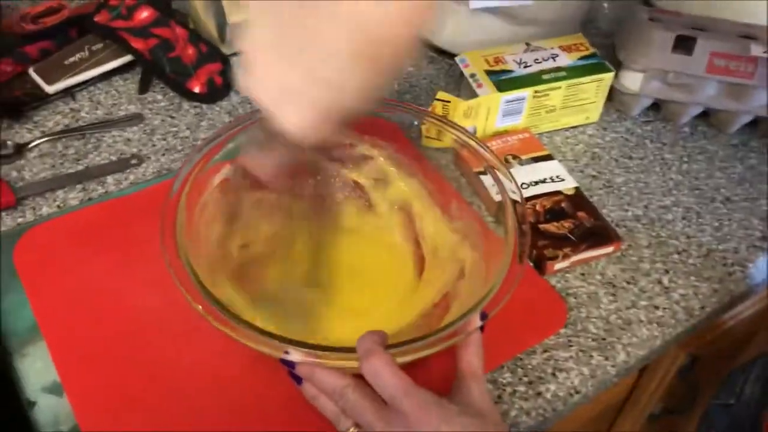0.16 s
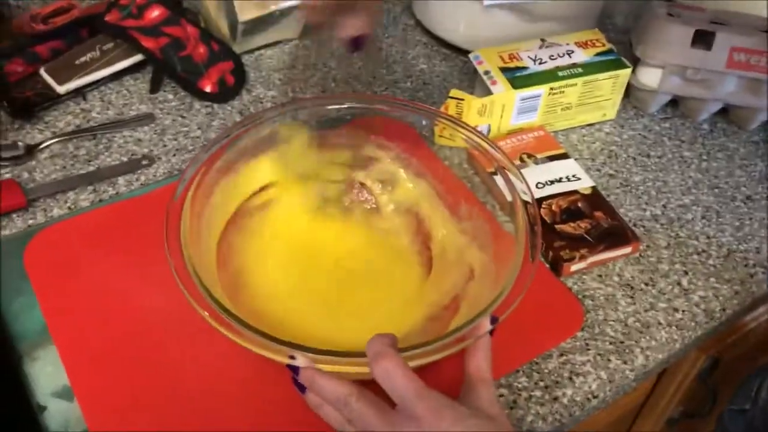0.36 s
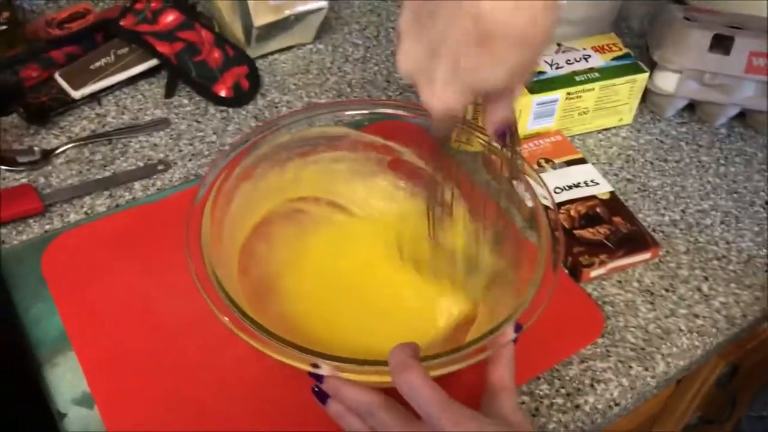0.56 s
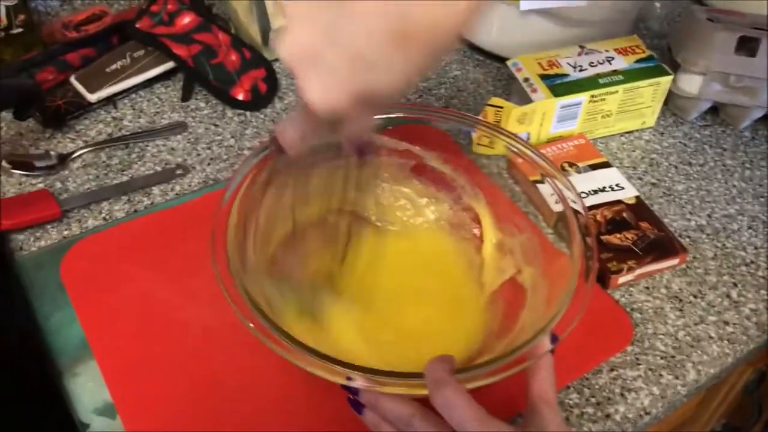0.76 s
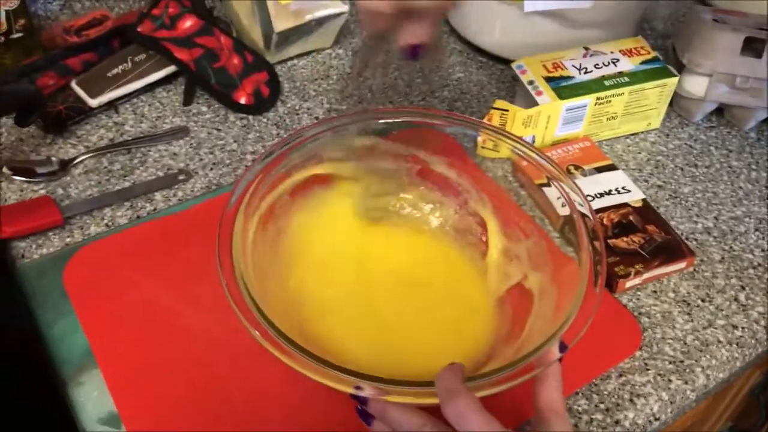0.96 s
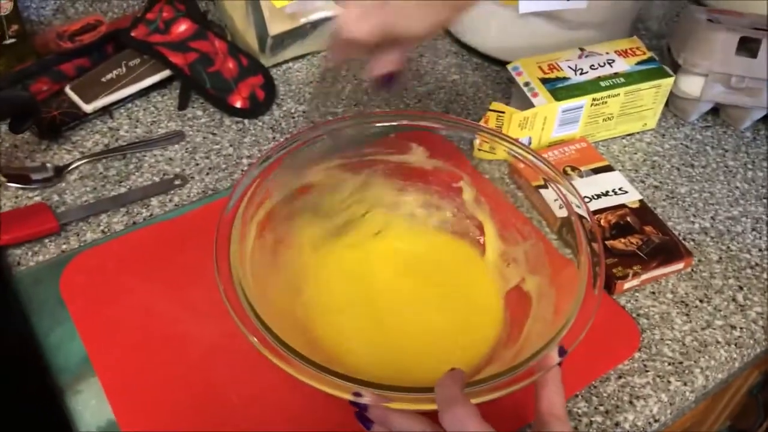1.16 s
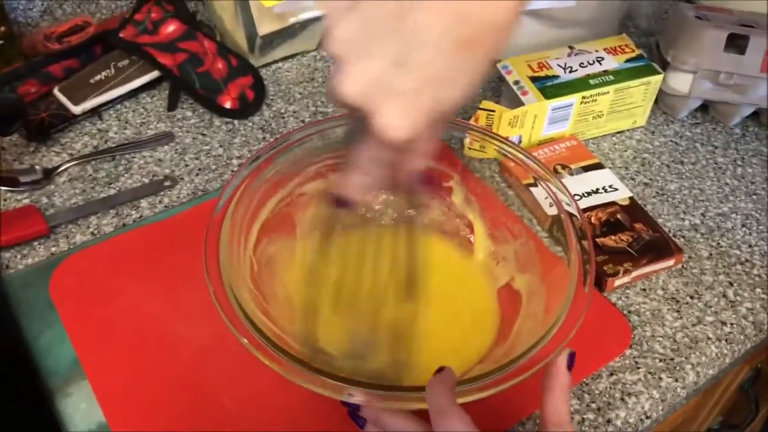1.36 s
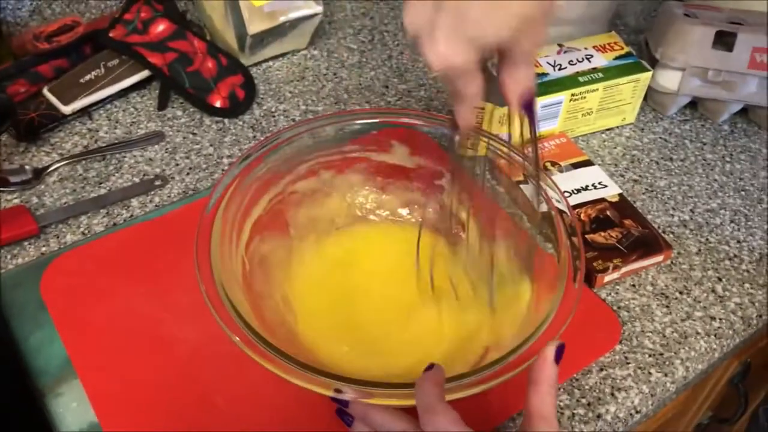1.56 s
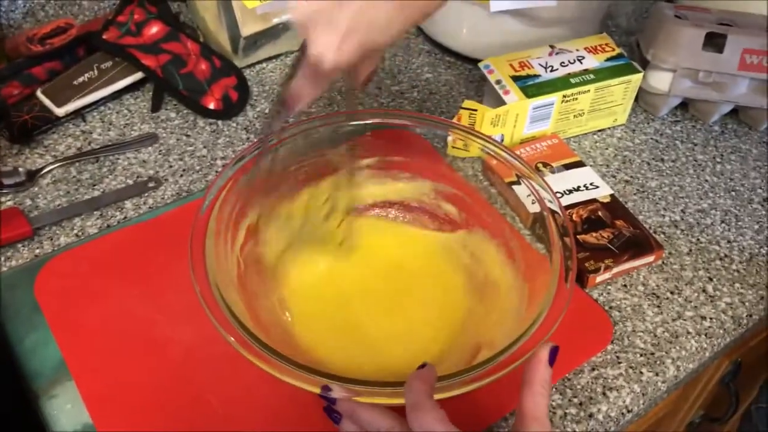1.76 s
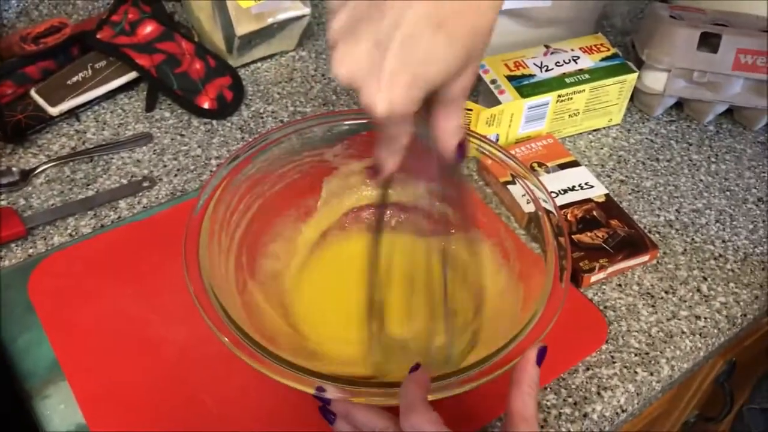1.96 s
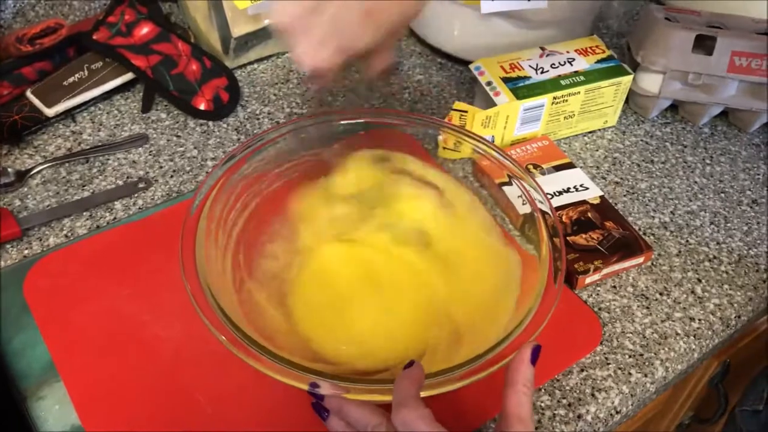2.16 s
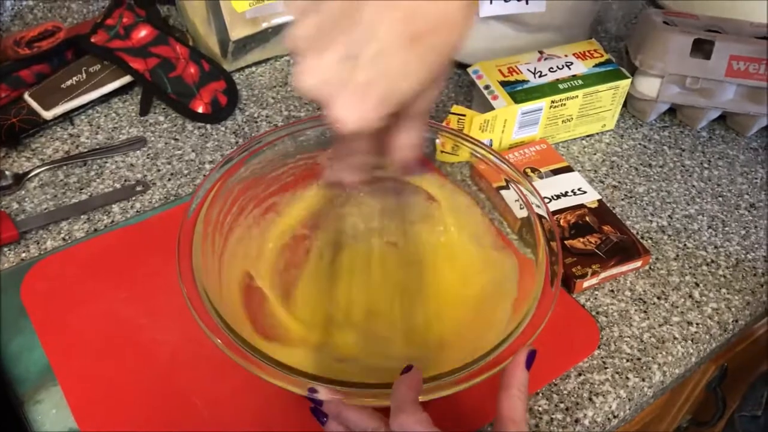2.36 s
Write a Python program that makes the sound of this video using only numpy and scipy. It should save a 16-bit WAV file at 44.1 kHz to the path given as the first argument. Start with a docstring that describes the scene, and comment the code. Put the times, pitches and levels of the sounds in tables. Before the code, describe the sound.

A wire whisk beats eggs in a glass bowl close by, ticking and scraping over a wet crackle. At about 0.2 seconds it clinks hard on the glass, followed by a soft bump of the bowl. From 0.7 seconds quick knocks crowd together with small plops and squelches. After 1.9 seconds the knocks fade, leaving ticks and wet sounds. A faint low kitchen hum lies behind throughout.

```python
"""A small kitchen, one microphone close to a hand-held glass bowl: a wire whisk beats eggs and sugar.
From the start the wires tick, scrape the wall and stir a wet crackle. At 0.24 s they knock hard and
ring the glass, then the bowl bumps once on its mat. From 0.7 s the knocks crowd together and air
pockets plop and squelch out of the egg. After 1.9 s the knocks fade, leaving mostly ticks and crackle.
A low hum and faint room noise lie far behind throughout."""
import sys
import numpy as np
from scipy import signal
from scipy.fft import rfft, irfft
from scipy.io import wavfile

SR = 44100
rng = np.random.default_rng(int(sys.argv[2]) if len(sys.argv) > 2 else 0)


def int16_out(signal):
    """Quantize to a 16-bit WAV file."""
    q = np.round(np.clip(np.atleast_2d(signal).T, -1, 1) * 32767)
    wavfile.write(sys.argv[1], SR, q.astype(np.int16))


N = 105840  # 2.4 s

# Levels in the tables are relative: each source adds its own gain.
# Wires knock on the glass. The point of contact decides how strongly each main mode rings;
# a clean knock rises fast, a glancing one slowly.
# start_s, clack_db, low_mode_db, middle_mode_db, high_mode_db, rise_s
KNOCKS = [(0.2371,-10,-23,-16.5,-5,0.0012), (0.246,-21,-33,-47,-18,0.0018),
          (0.5308,-15.5,-39,-17.5,-30.5,0.00024), (0.5487,-17.5,-52,-22,-42,0.00034),
          (.7185,-26,-46,-58,-36,0.0006), (0.725,-33,-37,-59,-28.5,0.0033), (0.756,-25,-34,-62,-27,0.0037),
          (0.771,-23.5,-26,-62,-26,0.004), (.782,-20,-21.5,-25,-20,0.0009), (0.8128,-26,-56,-43,-47,0.0024),
          (0.838,-26.5,-30,-55,-24.5,0.0012), (.854,-29,-54,-57,-27,0.00075),
          (0.881,-31,-42.5,-39,-41,0.0029), (0.9228,-24,-49,-27.5,-31,0.00075),
          (0.957,-27,-30.5,-54,-59,0.00095), (0.983,-38,-66,-54,-53,.001),
          (1.0105,-31,-37.5,-60,-34.5,0.00035), (1.048,-35.5,-36,-37,-35,0.0033),
          (1.069,-26,-57,-40,-37,0.0024), (1.09,-27,-39,-53,-35,0.0014), (1.133,-44,-36,-48,-37,0.0025),
          (1.2018,-27.5,-41,-75,-47,0.00057), (1.228,-26,-34.5,-36.5,-40.5,0.013),
          (1.263,-22,-28,-31,-38,0.0025), (1.37,-26,-40,-34,-33.5,0.0076), (1.387,-26.5,-44,-27,-55,0.0094),
          (1.411,-28,-61,-44,-50,0.0024), (1.62,-27.5,-55,-34,-36,0.0017), (1.665,-23,-36,-37,-32,0.0006),
          (1.6864,-23,-37,-39,-40,0.0034), (1.737,-29.5,-34,-42,-42,0.0014),
          (1.768,-36.5,-38.5,-53,-37,0.0024), (1.849,-31,-55,-55,-41.5,0.027),
          (1.889,-31,-38.5,-65,-51,0.0017), (1.935,-44,-62,-70,-41,0.018), (2.168,-57,-40,-52,-58,0.0015),
          (2.268,-45,-42,-40,-48,0.0081)]
# Modes of the glass bowl: pitch_hz
BOWL_MODE_HZ = [533, 1408, 2608, 4085, 3010, 3530, 5704, 6830, 7455, 8140, 8695, 9455, 11435]
# Strength and ring time of the same modes: level_db, t60_s
BOWL_MODE_RING = [(-24.5, 0.34), (-3.5, 0.092), (-4, 0.086), (-3.5, 0.064), (-19.5, 0.12), (-20.5, 0.13),
                  (-7.5, 0.048), (-19.5, 0.059), (-12.5, 0.062), (-14, 0.073), (-17, 0.063), (-11, 0.059),
                  (-15, 0.023)]
# Wires click against each other or swish through the mixture: start_s, level_db, rise_s
TICKS = [(0.0495,-19.5,0.00041), (0.0694,-22,0.003), (.143,-21.5,0.0084), (.162,-33,0.0058),
         (0.189,-24.5,0.004), (0.221,-24,0.0014), (0.4002,-18,0.0002), (0.457,-29,0.0014),
         (0.507,-23.5,0.0046), (0.571,-19.5,0.0011), (0.6504,-25,0.0022), (0.68,-20.5,0.0037),
         (1.161,-21.5,.005), (1.347,-21.5,0.002), (1.4747,-25,0.0017), (1.583,-22.5,0.0057),
         (1.651,-20,.002), (1.814,-33,0.00091), (1.846,-24,0.0009), (1.86,-25.5,0.0025),
         (1.872,-22.5,0.0022), (1.891,-31,0.0018), (1.924,-24,0.0011), (1.956,-22.5,0.0035),
         (2.017,-23,0.0012), (2.045,-23,0.0039), (2.095,-25.5,0.0037), (2.123,-28,.001),
         (2.136,-18.5,0.011), (2.154,-31,.001), (2.1625,-31,0.00061), (2.186,-27,0.0025),
         (2.218,-25,0.0023), (2.291,-27.5,0.0024), (2.3501,-20,0.001), (2.377,-30,0.0016)]
# Scraping level, following the pressure of the whisk on the wall: time_s, level_db
WALL_PRESSURE = [(0,-41.5), (.2,-43), (.38,-42), (.5,-36.5), (.63,-42.5), (.74,-35.5), (.88,-38),
                 (1.0,-38.5), (1.1,-36), (1.18,-35), (1.28,-40.5), (1.42,-35.5), (1.57,-42.5), (1.7,-35),
                 (1.85,-41.5), (1.95,-36), (2.06,-47), (2.4,-49.5)]
# Crackle level, following the speed of the whisk through the mixture: time_s, level_db
STIR_SPEED = [(0,-47.5), (.07,-51), (.2,-43.5), (.37,-54), (.5,-48.5), (.62,-51), (.75,-40), (.9,-47.5),
              (1.0,-50), (1.1,-47), (1.19,-48), (1.27,-52), (1.42,-46.5), (1.57,-49.5), (1.69,-46),
              (1.81,-49), (1.9,-46), (2.0,-49.5), (2.045,-45), (2.085,-53), (2.16,-45), (2.28,-47),
              (2.32,-50), (2.4,-43)]
# Air pockets churned out of the egg: start_s, level_db, pitch_hz
AIR_POCKETS = [(.684,-38,1150), (.727,-34,892), (0.766,-25.5,1014), (1.377,-30,1057), (1.523,-34.5,896),
               (1.594,-39,1130), (1.739,-41,1320), (1.923,-30.5,1100), (1.957,-33.5,1150),
               (2.017,-31.5,1154), (2.047,-29,1540), (2.125,-36.5,562), (2.28,-33,1300)]
# Spectrum of wires clacking on glass: frequency_hz, level_db
CLACK_SPECTRUM = [(100, -16), (400, -11.5), (1000, -3.5), (1500, 0.5), (2100, -8), (3000, 4.5), (4200, 3.5),
                  (5000, -2), (7500, -7.5), (10000, -10.5), (11500, -4.5), (16000, -14.5)]
# Spectrum of the light clicks and swishes: frequency_hz, level_db
TICK_SPECTRUM = [(200, -23.5), (700, 6), (1400, -13.5), (2200, -7), (3100, 9), (4700, -2), (7300, 7),
                 (10000, 0.5), (13000, 0), (16000, -11.5)]
# Spectrum of the crackling egg: frequency_hz, level_db
CRACKLE_SPECTRUM = [(120, -35), (200, -8), (320, -9.5), (520, -12), (916, -4.5), (1300, 1), (2330, -8),
                    (3430, -1), (4520, -11), (7010, -6.5), (13600, -14), (16000, -17.5)]
# Spectrum of the room tone: frequency_hz, level_db
ROOM_SPECTRUM = [(25, -26), (64, 2.5), (335, -11.5), (1000, -21.5), (16000, -52)]

MAIN_MODES = slice(1, 4)  # the bowl's low, middle and high main modes
MODE_SCATTER_DB, CONTACT_S = 4.5, 0.004
WAVER_PER_S, FROTH_CYCLES = 70, 45


def knocks(t, clack_db=-10.5, main_modes_db=-0.1, other_modes_db=-6):
    """Each knock on the wall is a dense clack of chattering wires and the ring of the glass."""
    clack, blows = np.zeros(N), []
    for start_s, db, *main_db, rise_s in KNOCKS:
        mode_db = db + other_modes_db + MODE_SCATTER_DB * rng.standard_normal(len(BOWL_MODE_HZ))
        mode_db[MAIN_MODES] = np.array(main_db) + main_modes_db
        blows.append((start_s, rise_s, mode_db))
        envelope = contact(t, rise_s, CONTACT_S, t60_s=0.045)
        add(clack, start_s, undb(db + clack_db) * rng.standard_normal(len(t)) * envelope)
    return flicker(colour(clack, CLACK_SPECTRUM), depth_db=2) + glass_ring(t, blows)


def glass_ring(t, blows, lag_s=0.002, after_ring_db=-38, detune=0.00451):
    """Blows (start_s, rise_s, mode_db) feed the bowl's modes, which ring on faintly as the wires leave."""
    out = 0
    for mode, (hz, (db, t60_s)) in enumerate(zip(BOWL_MODE_HZ, BOWL_MODE_RING)):
        energy = np.zeros(N)
        for start_s, rise_s, mode_db in blows:
            swell_s = rise_s + lag_s
            after_ring = undb(after_ring_db) * contact(t, swell_s, hold_s=0, t60_s=0.32)
            envelope = contact(t, swell_s, CONTACT_S, t60_s) + after_ring
            add(energy, start_s, (undb(db + mode_db[mode]) * envelope) ** 2)
        pitch_hz = hz * (1 + detune * wander(WAVER_PER_S))  # the pressing wires shift the mode a little
        out += np.sqrt(energy) * np.sin(2 * np.pi * np.cumsum(pitch_hz) / SR)
    return out


def ticks(t, wires_db=-14.5, ring_db=-32.5):
    """Light, grainy clicks and swishes of the wires that barely ring the bowl."""
    pressure, blows = np.zeros(N), []
    for start_s, db, rise_s in TICKS:
        add(pressure, start_s, undb(db + wires_db) * contact(t, rise_s, hold_s=0, t60_s=0.041))
        mode_db = db + ring_db + MODE_SCATTER_DB * rng.standard_normal(len(BOWL_MODE_HZ))
        blows.append((start_s, rise_s, mode_db))
    wires = colour(pressure * grains(per_s=7000, spread_db=-3), TICK_SPECTRUM)
    return flicker(wires, depth_db=2) + glass_ring(t, blows)


def scrape(t, clock, gain_db=-8, lowest_mode_db=7, main_modes_db=-3):
    """Wires stick and slip over sugar grains on the wall; the bowl's modes come and go."""
    drive_db = np.zeros(len(BOWL_MODE_HZ))
    drive_db[0], drive_db[MAIN_MODES] = lowest_mode_db, main_modes_db
    pressure = undb(np.interp(clock, *np.array(WALL_PRESSURE).T) + gain_db)
    slips = grains(per_s=350, spread_db=4) * pressure
    glass = sum(undb(db + drive) * np.sin(2 * np.pi * hz * t) * fade(t, t60_s)
                for hz, (db, t60_s), drive in zip(BOWL_MODE_HZ, BOWL_MODE_RING, drive_db))
    return convolve(flicker(slips, depth_db=3.5), glass)


def mixture(t, clock, crackle_db=0.5, clump_db=2, bubbles_db=-17, pops_db=-6):
    """Egg films crackle in clumps and tiny bubbles pop, louder as the whisk moves faster."""
    stir_db = np.interp(clock, *np.array(STIR_SPEED).T)
    films = grains(per_s=5000, spread_db=2)
    clumps = undb(stir_db + crackle_db + clump_db * wander(WAVER_PER_S))
    crackle = flicker(colour(films * clumps, CRACKLE_SPECTRUM), depth_db=3)
    plops = air_pockets(t)
    bubbles = undb(bubbles_db) * froth(t, per_s=70, hz=1262, cycles=FROTH_CYCLES, octaves=1)
    pops = undb(pops_db) * froth(t, per_s=450, hz=7180, cycles=24, octaves=1.92)
    return crackle + plops + undb(stir_db) * (bubbles + pops)


def air_pockets(t, plop_db=-6, squelch_db=-10.5, squelch_s=0.011, spread_octaves=0.495):
    """Each air pocket plops and breaks into a squelch of four small bubbles."""
    out = np.zeros(N)
    for start_s, db, hz in AIR_POCKETS:
        add(out, start_s, undb(db + plop_db) * bubble(t, hz, cycles=60))
        for delay, pitch in rng.random((4, 2)):
            small_hz = hz * 2 ** (spread_octaves * (2 * pitch - 1))
            small = undb(db + squelch_db) * bubble(t, small_hz, FROTH_CYCLES)
            add(out, start_s + delay * squelch_s, small)
    return out


def froth(t, per_s, hz, cycles, octaves):
    """Bubbles burst at random times and pitches, most of them faintly; rms 1."""
    out = np.zeros(N)
    for when, pitch, size in rng.random((int(per_s * N / SR), 3)):
        bubble_hz = hz * 2 ** (octaves * (pitch - 0.5))
        add(out, when * N / SR, size ** 2 * bubble(t, bubble_hz, cycles))
    return unit(out)


def bubble(t, hz, cycles, glide=0.03):
    """A short, damped tone that rises as the air pocket shrinks."""
    life_s = cycles / hz
    pitch_hz = hz * (1 + glide * np.minimum(t / life_s, 1))
    onset = np.minimum(t * hz / 2, 1)
    return np.sin(2 * np.pi * np.cumsum(pitch_hz) / SR) * fade(t, life_s) * onset


def bowl_bump(t, start_s=0.338, gain_db=-29.5, low_hz=124, high_hz=170, rise_s=0.0082):
    """The bowl settles on its mat on the counter with a soft thud."""
    out = np.zeros(N)
    thud = np.sin(2 * np.pi * low_hz * t) + 0.54 * np.sin(2 * np.pi * high_hz * t)
    add(out, start_s, undb(gain_db) * thud * fade(t, t60_s=0.044) * np.minimum(t / rise_s, 1))
    return out


def kitchen_reflections(direct, t, gain_db=-12.5, rise_s=0.0014):
    """The counter and nearby walls send a short, diffuse tail to the microphone."""
    tail = rng.standard_normal(len(t)) * fade(t, t60_s=0.25) * np.minimum(t / rise_s, 1)
    return undb(gain_db) * convolve(direct, tail)


def room_tone(hum_hz=55.7, hum_db=-62.5, noise_db=-61.5):
    """Far behind the bowl, a wavering low hum over quiet room noise."""
    hum_band = signal.butter(2, [hum_hz * 0.88, hum_hz * 1.085], "band", fs=SR, output="sos")
    hum = signal.sosfilt(hum_band, rng.standard_normal(N))
    noise = colour(rng.standard_normal(N), ROOM_SPECTRUM)
    return undb(hum_db) * unit(hum) + undb(noise_db) * unit(noise)


def undb(db):
    """Decibels to gain."""
    return 10 ** (np.asarray(db) / 20)


def unit(x):
    """Scale to rms 1."""
    return x / np.sqrt(np.mean(x ** 2))


def add(out, start_s, x):
    """Mix a sound in at a given time."""
    i = int(np.clip(start_s * SR, 0, N - 1))
    out[i:i + len(x)] += x[:N - i]


def fade(t, t60_s):
    """Exponential decay, 60 dB down after t60_s."""
    return np.exp(-np.log(1000) * np.maximum(t, 0) / t60_s)


def contact(t, rise_s, hold_s, t60_s):
    """Envelope of a contact: rise, hold, die away."""
    return np.minimum(t / rise_s, 1) * fade(t - rise_s - hold_s, t60_s)


def convolve(x, response):
    """Pass a sound through an impulse response scaled to unit energy."""
    return signal.fftconvolve(x, response / np.linalg.norm(response))[:N]


def colour(x, spectrum, size=8192):
    """Minimum-phase filter of unit power with the shape of the given spectrum."""
    hz, db = np.array(spectrum).T
    bin_hz = np.maximum(np.fft.rfftfreq(size, 1 / SR), 1)
    gain = undb(np.interp(np.log(bin_hz), np.log(hz), db))
    cepstrum = irfft(np.log(gain))
    cepstrum[1:size // 2] *= 2  # folding the cepstrum makes the filter causal
    cepstrum[size // 2 + 1:] = 0
    return convolve(x, irfft(np.exp(rfft(cepstrum))))


def grains(per_s, spread_db):
    """Random impulses, a few much louder than the rest (softer if spread_db is negative); rms 1."""
    size = undb(spread_db * np.minimum(rng.exponential(size=N), 4))
    return unit((rng.random(N) < per_s / SR) * size * rng.choice([-1, 1], N))


def wander(per_s):
    """Continuous random drift between -2 and 2."""
    points = rng.uniform(-2, 2, size=1024)
    return np.interp(np.arange(N) * (per_s / SR), np.arange(len(points)), points)


def flicker(x, depth_db, per_s=45):
    """The level of each half octave wavers quickly on its own."""
    octave = np.log2(np.clip(np.fft.rfftfreq(N, 1 / SR), 2 ** 9, 2 ** 14))
    spectrum, out = rfft(x), 0
    for centre in np.arange(9, 14.5, 0.5):
        band = np.maximum(1 - 2 * abs(octave - centre), 0)
        out += irfft(spectrum * band, N) * undb(depth_db * wander(per_s))
    return out


def scene():
    """Whisk, bowl and mixture close up, the kitchen behind; mono."""
    clock = np.arange(N) / SR
    t, bubble_t = clock[:SR // 4], clock[:SR // 10]  # seconds within one event
    far = room_tone()
    near = knocks(t) + ticks(t) + scrape(t, clock) + bowl_bump(t) + mixture(bubble_t, clock)
    return (near + kitchen_reflections(near, t) + far)[None]


def record(dry, top_hz=15800):
    """The recorder cuts the top steeply."""
    return signal.sosfilt(signal.ellip(10, 0.2, 80, top_hz, fs=SR, output="sos"), dry)


dry = scene()
out = record(dry)
int16_out(out)
```